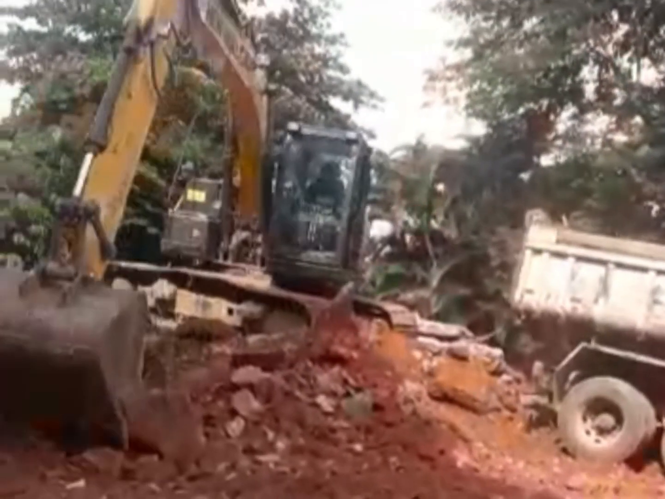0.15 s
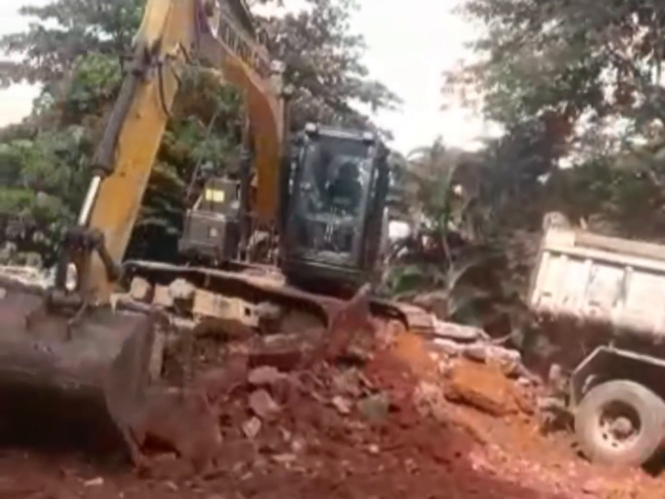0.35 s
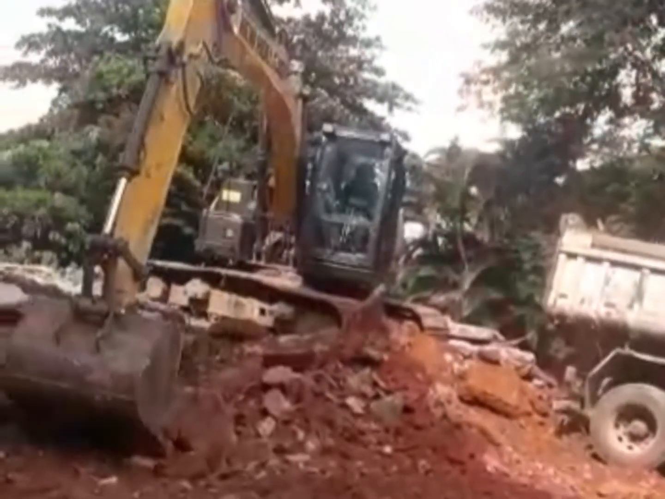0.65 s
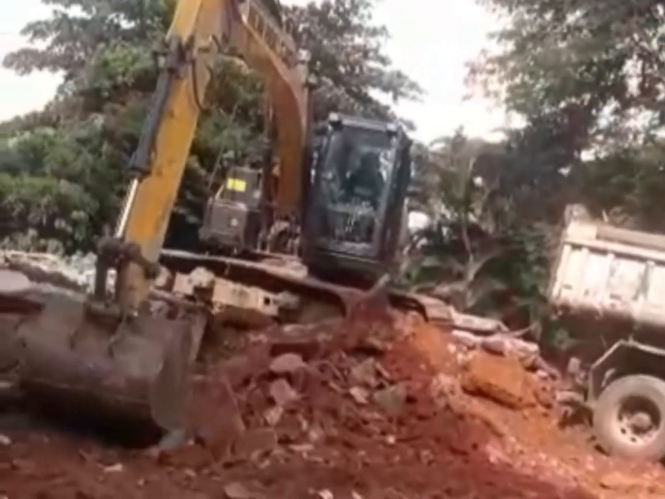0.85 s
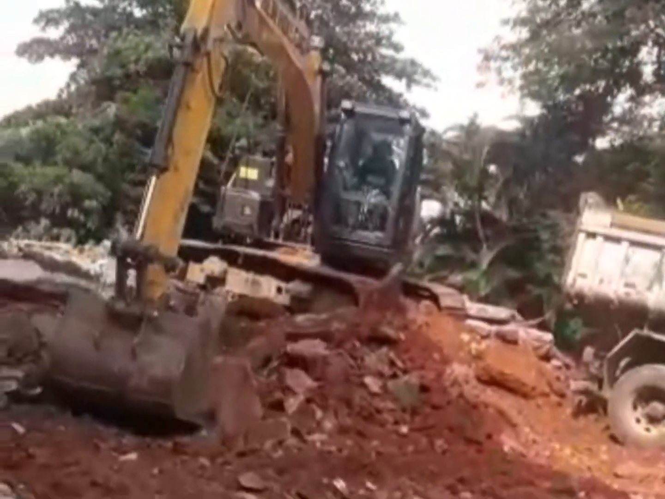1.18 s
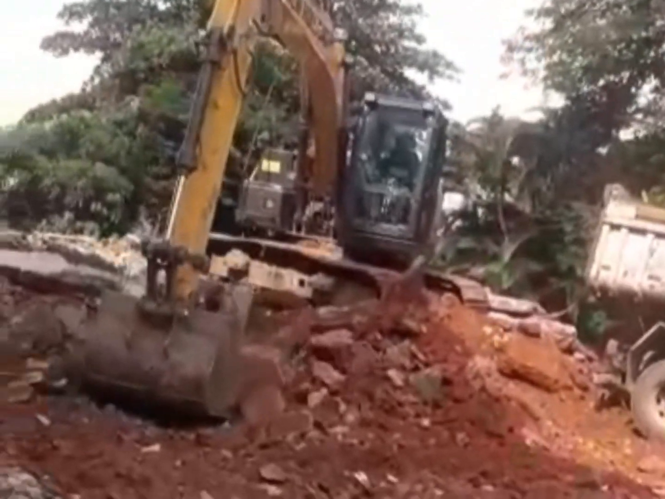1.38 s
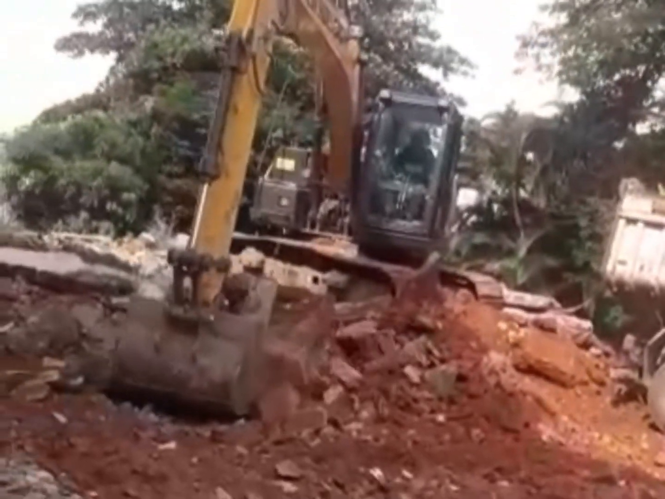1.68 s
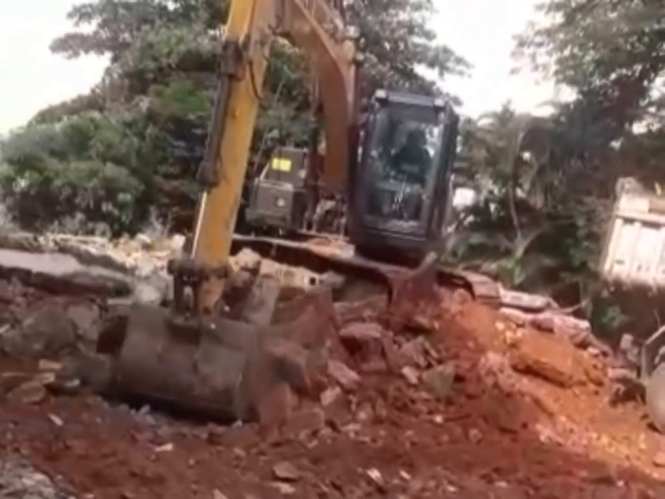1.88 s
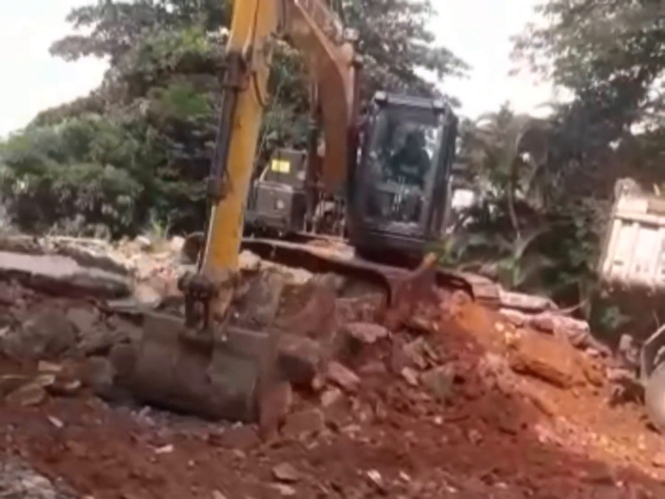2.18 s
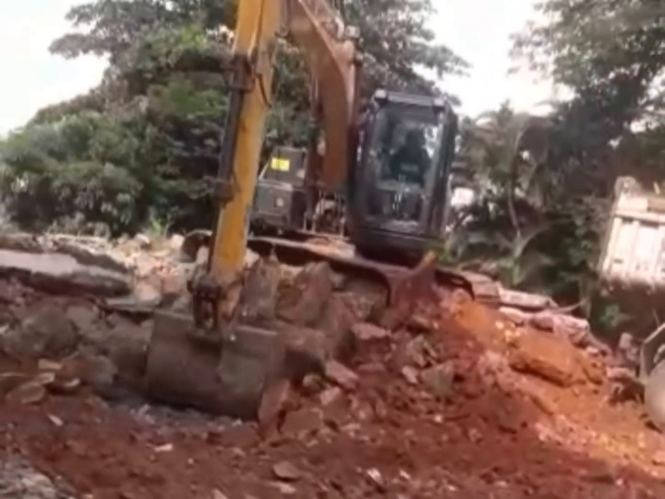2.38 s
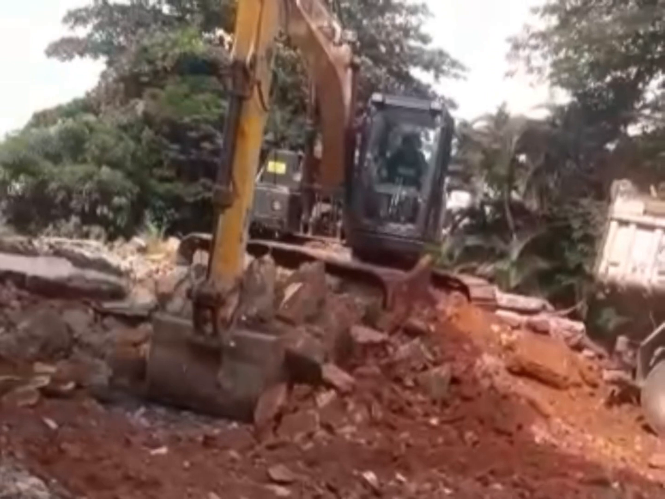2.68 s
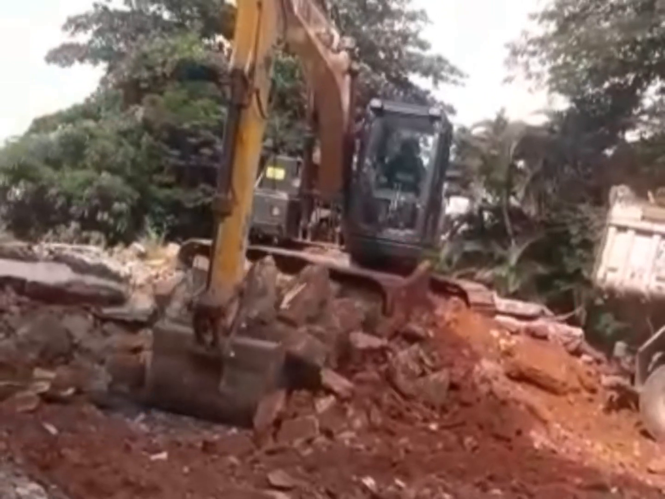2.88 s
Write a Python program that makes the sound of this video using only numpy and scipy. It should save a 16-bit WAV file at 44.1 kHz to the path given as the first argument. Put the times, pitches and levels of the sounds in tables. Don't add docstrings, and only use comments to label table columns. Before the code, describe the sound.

An excavator bucket drags through rubble over a steady diesel roar, thin pump whine and faint knocking truck idle. Stones clank at 0.2 seconds, then hollow booms and coarse grinding build from 0.4 to 0.8, loudest near 0.65. Lighter bumps and scrapes follow from 1.1 to 2.0, with faint squeals. Deep thuds return around 2.25; pebbles snap, and a slab clacks sharply and bounces at 2.8. Outdoor echoes scatter.

```python
import sys
import numpy as np
from scipy import signal
from scipy.fft import rfft, irfft
from scipy.io import wavfile
from scipy.ndimage import uniform_filter1d

SR = 44100
rng = np.random.default_rng(int(sys.argv[2]) if len(sys.argv) > 2 else 0)


def dump_mix(stems):
    frames = np.atleast_2d(stems).T
    limited = np.clip(frames, -1, 1)
    pcm = np.round(limited * 32767).astype(np.int16)
    wavfile.write(sys.argv[1], SR, pcm)


def level_to_linear(level):
    exponent = np.asarray(level, float) / 20
    return 10 ** exponent


N = 134505

# f/Hz, level/dB per Hz
EXHAUST = [(45, -2.0), (65, -3.5), (90, -5.5)]
# f/Hz, level/dB, time to fall 60 dB/s
KNOCK = [(285, -27, .04), (350, -26, .03), (420, -28, .03)]
# t/s, f/Hz
PUMP_WHINE = [(0, 603.4), (0.398, 599.5), (0.899, 597), (1.15, 610), (1.418, 595.3), (1.952, 605.2),
              (2.15, 598.8), (2.552, 600), (3.05, 598.5)]
# multiple of the shaft speed, level/dB rms
SHAFT_TONES = [(2, -59), (3, -44.5), (12, -54), (16, -50.5), (17, -45.5)]
# t/s, level/dB
EFFORT = [(0, -3.5), (.2, -2.5), (.5, -1), (1.2, 0.5), (1.8, 0), (2.4, 0.5), (3.05, 0)]
# f/Hz, level/dB per Hz
ROAR = [(15, -48.5), (25, -28.5), (72, 2.5), (102, -2.5), (263, -5), (465, -22), (600, -17.5), (657, -18),
        (900, -20), (1170, -37.5), (1980, -120)]
# f/Hz, level/dB per Hz
CLATTER = [(290, -45), (500, -0.5), (599, -8.5), (727, -9), (1500, -9), (1800, -18.5), (2080, -14.5),
           (3320, -27.5), (7500, -42), (9750, -73), (16500, -120)]
# f/Hz, level/dB per Hz
HISS = [(3820, -21.5), (6500, -2), (7940, -12.5), (9510, -12.5), (11100, -7), (15100, -3.5), (16000, -14.5)]
# t/s, peak level/dB, f/Hz
SNAPS = [(0.242, -46, 3950), (.373, -58, 6900), (1.405, -49, 4600), (1.517, -53, 6006), (1.6, -51.5, 6000),
         (1.631, -53, 12900), (1.664, -50, 5450), (1.813, -51.5, 5770), (2.28, -51, 4500),
         (2.346, -49, 6000), (2.476, -40.5, 4700), (2.686, -45.5, 5076), (2.7792, -41, 4200),
         (3.043, -45, 4293)]
# f/Hz, level/dB, time to fall 60 dB/s
SLAB = [(558.5, -5, 0.067), (687, -3, 0.052), (879, 0.5, 0.043), (1300, -5, 0.026), (1580, -8.5, 0.022),
        (2360, -11.5, 0.025), (2837, -24, .07), (3830, -20, 0.012)]
# t/s after landing, level/dB
BOUNCES = [
    (.0215, -11),
    (.030, -14),
]
# t/s, level/dB, f/Hz, length/s
SQUEALS = [(0.49, -66.5, 5900, 0.21), (0.45, -82, 7200, 0.025), (1.927, -65.5, 5300, .035),
           (2.077, -65.5, 6300, .1), (1.51, -76, 14000, .035), (2.76, -67, 6170, 0.037),
           (2.1, -80, 14500, 0.22)]
# t/s, level/dB of the load on the shell, level/dB of the grit at the teeth
DRAG = [(.2, -40.5, -61), (0.239, -23, -48), (.34, -43, -60), (.44, -29.5, -53.5), (.55, -26, -32.5),
        (0.65, -18.5, -30), (.8, -23.5, -37.5), (.92, -51, -49.5), (1.05, -35.5, -52), (1.15, -31.5, -41.5),
        (1.3, -36, -55), (1.6, -46, -50.5), (1.7, -36.5, -39), (1.9, -37, -49.5), (2.179, -35.5, -40.5),
        (2.28, -22.5, -33.5), (2.379, -36.5, -44), (2.65, -46, -50.5)]
# f/Hz, level/dB, time to fall 60 dB/s
PLATES = [(591, -4.5, 0.16), (673, 6, 0.14), (734.5, -6, 0.41), (814, -2.5, 0.25), (923, 4.5, 0.058),
          (1150.6, 0, 0.16), (1418, -5.5, 0.19), (1500, -6.5, 0.25), (1637, -1, 0.14), (2008, -8.5, 0.27),
          (2193, -17.5, 0.45), (2673, -18.5, 0.2), (2865, -8.5, 0.098), (3390, -19.5, 0.17)]
# f/Hz, level/dB per Hz
GRIT = [(300, -29.5), (720, 1.5), (1000, -3), (1550, -3.5), (2900, -21), (4400, -37.5), (6300, -37),
        (9400, -74.5)]
# t/s, peak level/dB, centre f/Hz, scatter/s
STRIKES = [(.158, -39, 650, .004), (0.216, -14, 800, 0.015), (.224, -19.5, 600, .014),
           (0.2407, -14.5, 1100, 0.008), (.241, -32.5, 3390, 0.0078), (.251, -23, 1900, .008),
           (.258, -23, 1320, 0.015), (.284, -31.5, 1700, .02), (0.371, -24, 1150, 0.01),
           (.385, -26.5, 1007, .03), (.484, -25, 1400, 0.008), (.512, -25, 1560, 0.0075),
           (.538, -27.5, 780, .006), (.549, -23.5, 780, .008), (.577, -19.5, 810, .01),
           (.612, -25, 1450, .012), (.615, -23.5, 750, .01), (.638, -27, 1500, .01),
           (0.661, -28.5, 1550, .006), (.668, -20, 750, 0.011), (.687, -26.5, 700, .01),
           (.741, -22, 650, .008), (.763, -23.5, 700, .01), (.793, -32, 900, .01), (.748, -37, 2700, 0.045),
           (1.113, -37.5, 1500, 0.0046), (1.127, -32, 1450, 0.0018), (1.153, -35, 1500, 0.016),
           (1.401, -31.5, 1306, 0.0086), (1.634, -35, 650, .006), (1.936, -34, 1500, 0.035),
           (2.198, -26.5, 800, .015), (2.346, -30, 1800, 0.0045), (2.427, -27, 1200, 0.0073),
           (2.686, -36.5, 1770, 0.0071), (2.729, -39.5, 660, .006), (2.79, -30, 700, 0.014),
           (2.948, -33.5, 1220, 0.024)]
# f/Hz, level/dB, time to fall 60 dB/s
SHELL = [(82, -19.5, 0.079), (108, -10, 0.41), (132, -3.5, 0.1), (148, 2.5, 0.18), (176.8, -5.5, 0.13),
         (190.8, 1, 0.25), (260.3, -5, 0.24), (278, -15, 0.22)]
# t/s, peak level/dB, f/Hz
THUMPS = [(0.225, -14, 268), (0.244, -12, 191), (0.281, -17, 190), (0.301, -27, 140), (0.421, -14.5, 148),
          (.448, -15, 148), (0.553, -10.5, 148), (.58, -11, 148), (.63, -13, 170), (0.661, -3, 148),
          (0.716, -11, 142), (0.756, -9.5, 148), (1.075, -10.5, 158.3), (1.134, -18, 177),
          (1.744, -12.5, 108), (1.808, -13, 105), (1.997, -23.5, 125), (2.207, -14.5, 191),
          (2.246, -5, 187), (2.275, -5, 148), (2.298, -10, 113.6), (2.43, -22.5, 268), (2.514, -19, 95)]


def evened(x):
    return x / np.sqrt(np.mean(x ** 2) + 1e-20)


def noise(length=N):
    return rng.standard_normal(length)


def coloured(x, points):
    f, db = np.transpose(points)
    log_hz = np.log(np.fft.rfftfreq(len(x), 1 / SR) + 1)
    gain = level_to_linear(np.interp(log_hz, np.log(f), db, -120, -120))
    return irfft(rfft(x) * gain, len(x))


def slow(per_s):
    span = max(int(SR / per_s), 1)
    return evened(uniform_filter1d(uniform_filter1d(noise(), span), span))


def over_time(s, values):
    return np.interp(np.arange(N) / SR, s, values)


def ring(hz, db, t60, rise_s):
    t = np.arange(SR // 2) / SR
    fade = level_to_linear(db - 60 * t / max(t60, .002))
    rise = 1 - np.exp(-t / max(rise_s, 1e-5))
    return fade * np.sin(2 * np.pi * hz * t) * rise


def add(mix, s, sound):
    part = mix[round(s * SR):][:len(sound)]
    part += sound[:len(part)]


def grains(per_s, spread_db):
    size = level_to_linear(spread_db * np.minimum(rng.exponential(1, N), 5))
    sign = rng.choice([-1., 1.], N)
    return size * sign * (rng.random(N) < per_s / SR)


def drag(column):
    rows = np.transpose(DRAG)
    return level_to_linear(over_time(rows[0], rows[column]))


def yard(x):
    spacing, t60_s = 22, 0.78
    at = np.arange(300, SR // 2, spacing)
    taps = np.zeros(SR // 2 + spacing)
    sign = rng.choice([-1., 1.], len(at))
    taps[at + rng.integers(0, spacing, len(at))] = sign * level_to_linear(-60 * at / SR / t60_s)
    return signal.oaconvolve(x, taps / np.linalg.norm(taps))[:N]


def truck():
    start_s, cycle_s = .1005, .1528
    out = np.zeros(N)
    for s, chance_db in zip(np.arange(start_s, N / SR, cycle_s), noise(30)):
        knock = sum(ring(hz, db, t60, 0.0019) for hz, db, t60 in KNOCK)
        add(out, s, level_to_linear(chance_db) * knock)
    cycle = (np.arange(N) / SR - start_s) / cycle_s
    heave = (1 + np.cos(2 * np.pi * (cycle - .33))) / 2
    return out + level_to_linear(-54.5) * heave * evened(coloured(noise(), EXHAUST))


def engine():
    whine_order = 17
    whine_hz = over_time(*np.transpose(PUMP_WHINE)) + .6 * slow(4.9)
    turns = np.cumsum(whine_hz) / whine_order / SR
    tones = np.zeros(N)
    for order, db in SHAFT_TONES:
        level = np.sqrt(2) * level_to_linear(db + 2.72 * slow(16))
        tones += level * np.sin(2 * np.pi * (round(order) * turns + rng.random()))
    firing = np.exp(-(2 * turns % 1) / 0.37)
    roar = coloured(noise() * (1 + 2.3 * firing), ROAR)
    roar *= level_to_linear(0.77 * slow(40) + over_time(*np.transpose(EFFORT)))
    rattle = noise() + 0.2 * evened(grains(900, 15.0))
    clatter = coloured(rattle * (1 + 0.35 * firing), CLATTER) * level_to_linear(0.99 * slow(8.8))
    air = noise() * (1 + 0.26 * firing) + 0.48 * evened(grains(500, 4.1))
    hiss = coloured(air, HISS) * level_to_linear(.6 * slow(15))
    return tones + level_to_linear(-34.5) * evened(roar) + level_to_linear(-47.5) * evened(clatter) + level_to_linear(-73) * evened(hiss)


def pebbles():
    out, t = np.zeros(N), np.arange(2048) / SR
    for s, db, hz in SNAPS:
        snap = coloured(noise(len(t)), [(.2 * hz, -9), (hz, 0), (1.63 * hz, -16)])
        snap *= np.exp(-t / 0.012)
        add(out, s, level_to_linear(db) * np.minimum(t / 0.0033, 1) * snap / abs(snap).max())
    return out


def slab():
    land_s, crack_s, crack_hz, crack_width_s = 2.782, 2.7817, 920, 0.00099
    out = np.zeros(N)
    clack = level_to_linear(-6 - 3) * sum(ring(*mode, 0.00034) for mode in SLAB) / 3
    for delay_s, db in [(0, 0)] + BOUNCES:
        add(out, land_s + delay_s, level_to_linear(db) * clack)
    u = np.arange(N) / SR - crack_s
    crack = np.cos(2 * np.pi * crack_hz * u) * np.exp(-(u / crack_width_s) ** 2)
    return out - level_to_linear(-10.5) * crack


def squeals():
    out = np.zeros(N)
    for s, db, hz, length_s in SQUEALS:
        t = np.arange(0, length_s, 1 / SR)
        squeal = coloured(noise(10000), [(0.88 * hz, -20), (hz, 0), (1.3 * hz, -20)])
        add(out, s, level_to_linear(db) * np.sin(np.pi * t / length_s) * evened(squeal)[:len(t)])
    return out


def plates():
    rub = evened(grains(2500, 2.2)) * drag(column=2) * level_to_linear(2.28 * slow(47))
    body = sum(ring(hz, db, 0.28 * t60, 0.00011) for hz, db, t60 in PLATES)
    out = level_to_linear(-4.5) * signal.oaconvolve(rub, body / np.linalg.norm(body))[:N]
    crunch = coloured(rub, GRIT)
    out += level_to_linear(-1.5) * crunch * np.linalg.norm(rub) / np.linalg.norm(crunch)
    t = np.arange(8192) / SR
    for s, db, centre_hz, scatter_s in STRIKES:
        fade = np.exp(-t / np.clip(scatter_s, .001, .03)) * (1 - np.exp(-t / 0.00019))
        modes = np.zeros(SR // 2)
        for hz, mode_db, t60 in PLATES:
            far_db = 11 * abs(np.log2(hz / centre_hz))
            modes += ring(hz, 0.71 * mode_db - far_db, 0.37 * t60, 0.0006)
        hit = signal.oaconvolve(noise(len(t)) * fade, modes)[:len(t)]
        dust = coloured(noise(len(t)), [(0.17 * centre_hz, -22), (0.79 * centre_hz, -3),
                                        (1.18 * centre_hz, 0), (1.88 * centre_hz, -26), (12000, -80)])
        hit = hit / abs(hit).max() + 1.15 * fade * evened(dust) / 2
        add(out, s, level_to_linear(db) * hit / abs(hit).max())
    return out


def shell():
    push_db, push_cycles = -6.5, 0.71
    slips = evened(grains(300, 1.0)) * drag(column=1)
    rings = [ring(hz, db, 0.67 * t60, 0.0039) for hz, db, t60 in SHELL]
    body = sum(signal.oaconvolve(slips * level_to_linear(1.51 * slow(33)), r)[:N] for r in rings)
    out = level_to_linear(1.0) * body / np.linalg.norm(rings)
    for s, db, pitch_hz in THUMPS:
        bump = np.zeros(SR // 2)
        for hz, mode_db, t60 in SHELL:
            far_db = 26 * abs(np.log2(hz / pitch_hz))
            bump += ring(hz, mode_db - far_db, 0.54 * t60, 0.0076)
        add(out, s, level_to_linear(db - 7) * bump / abs(bump).max())
        cycles = np.arange(4096) / SR * pitch_hz - 1.6
        push = np.cos(2 * np.pi * cycles) * np.exp(-(cycles / push_cycles) ** 2)
        add(out, s, -level_to_linear(db + push_db) * push)
    return out


def scene():
    near = pebbles() + slab() + squeals() + plates() + shell()
    t = np.arange(N) / SR
    ends = np.clip(np.minimum(t / .006, (t[-1] - t) / .002), 0, 1)
    return (ends * (near + level_to_linear(-11) * yard(near) + engine() + truck()))[None]


def top_cut(x):
    return signal.sosfilt(signal.butter(12, 16960, fs=SR, output="sos"), x)


def record(dry):
    high_pass = signal.butter(2, 55, "high", fs=SR, output="sos")
    no_rumble = signal.sosfilt(high_pass, dry)
    low_pass = signal.firwin(511, 15800, fs=SR)[None]
    return top_cut(signal.oaconvolve(no_rumble, low_pass, "same"))


dry = scene()
out = record(dry)
dump_mix(out)
```